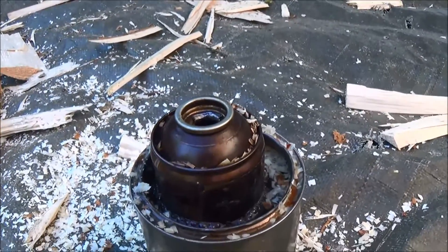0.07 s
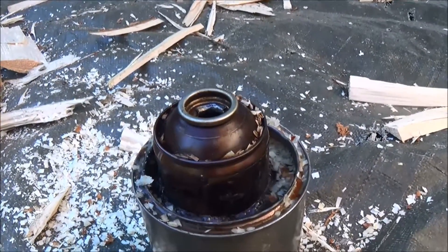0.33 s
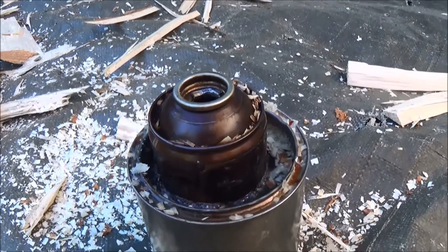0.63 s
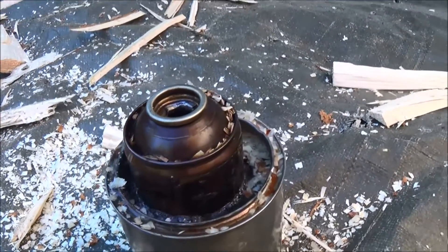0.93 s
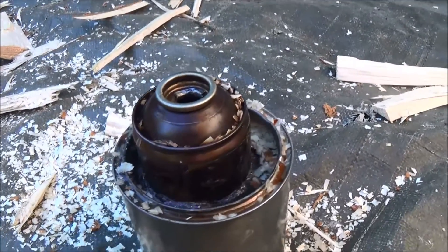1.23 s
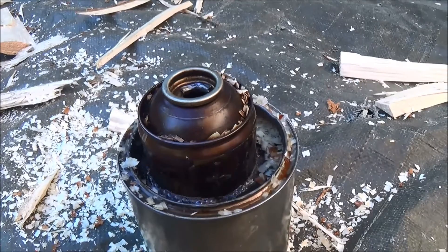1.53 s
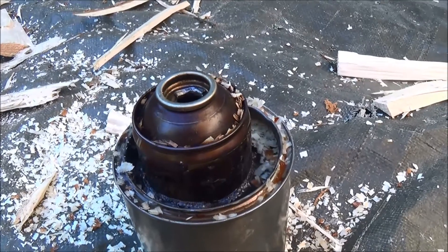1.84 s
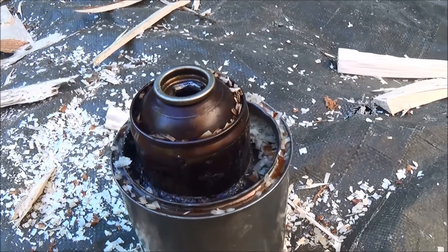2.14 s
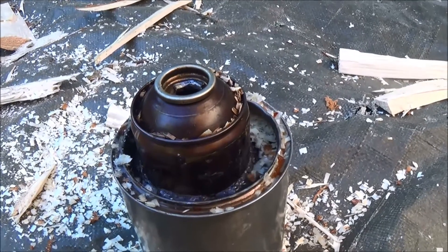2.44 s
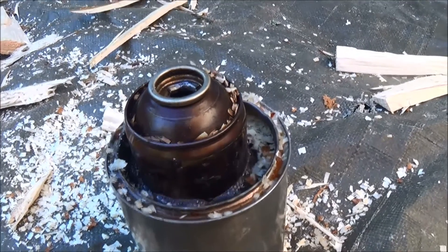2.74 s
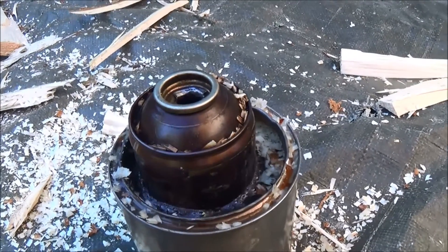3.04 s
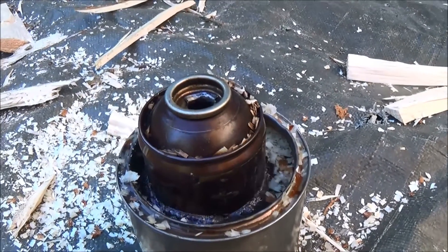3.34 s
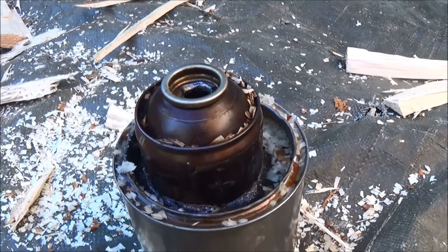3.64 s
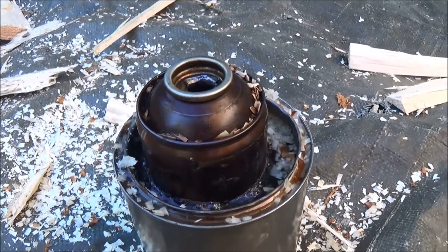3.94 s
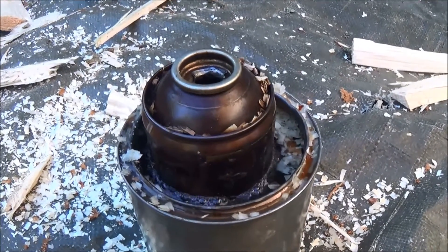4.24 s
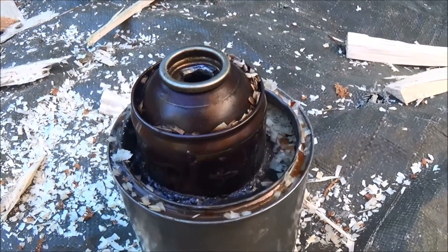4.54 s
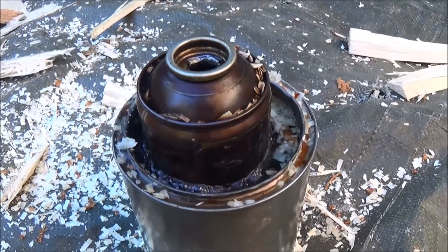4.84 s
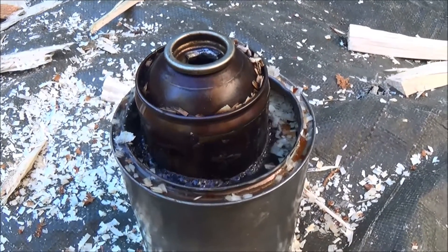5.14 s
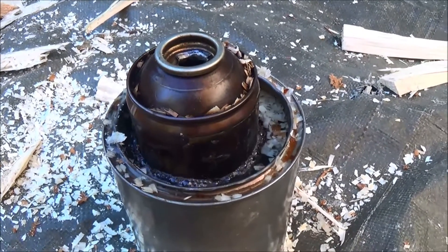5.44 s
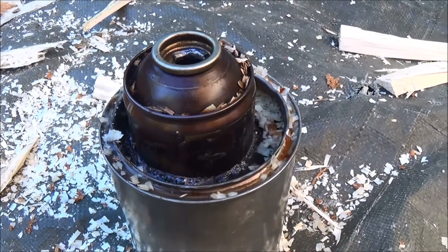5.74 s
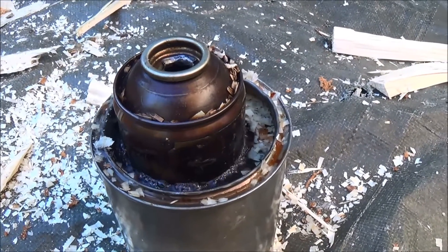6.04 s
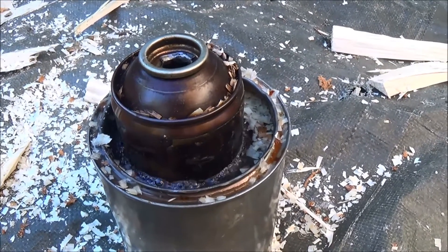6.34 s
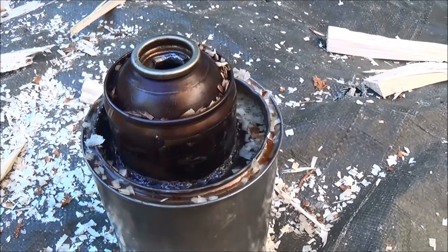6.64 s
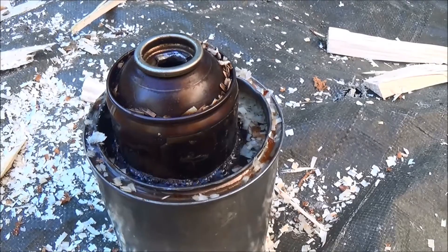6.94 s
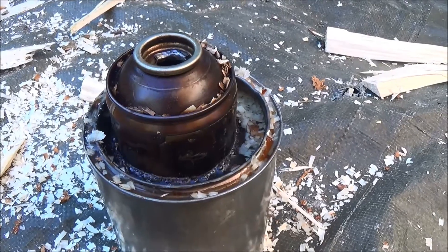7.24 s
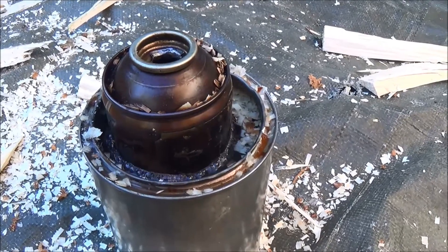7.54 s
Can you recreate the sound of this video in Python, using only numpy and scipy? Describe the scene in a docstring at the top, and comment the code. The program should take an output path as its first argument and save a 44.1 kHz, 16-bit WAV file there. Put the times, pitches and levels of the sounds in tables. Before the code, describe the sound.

A small pulse jet runs close by outdoors, a loud, rough buzzing roar of rapid hollow pops with hiss and rumble.

```python
"""A small pulse jet, a burner can with one round mouth and no valves, runs outdoors close to a phone.
About 52 times a second its fuel fires: a sharp pop, a swing of the gas in the can and a hissing jet.
The flow then turns round with a soft thud and fresh air whistles back in, while the flame rumbles below.
The pace keeps sagging and picking up, and one firing half fails."""
import sys
import numpy as np
from scipy import signal
from scipy.fft import rfft, irfft
from scipy.io import wavfile
from scipy.ndimage import map_coordinates

SR = 44100
rng = np.random.default_rng(int(sys.argv[2]) if len(sys.argv) > 2 else 0)


def unload_audio(sound):
    """Save the sound as a 16-bit wav file, at the path given as the first command line argument."""
    columns = np.transpose(np.atleast_2d(sound))
    # keep every value between -1 and 1, then stretch to whole-number steps
    steps = np.round(np.clip(columns, -1, 1) * 32767)
    wavfile.write(sys.argv[1], SR, steps.astype(np.int16))


N = 339570
HZ = np.fft.rfftfreq(N, 1 / SR)
AGE = np.arange(-300, 2600) / SR  # seconds since a firing, starting just before it

# the hollow voice that the can gives each pop: (frequency [Hz], boost [dB])
POP_VOICE = [(50, -6.5), (140, 6), (310, 0), (385, -4), (470, -1.5), (600, 0), (810, 0.5), (970, -5.5),
             (1150, -10), (1600, -6), (2400, -12.5)]

def pops(times, charge_db):
    """Each firing sends a short push of pressure through the can; a strong charge of fuel burns faster."""
    speed = undb(0.49 * charge_db + 3.2 * np.tanh(scatter(times)))
    burn_s = 0.00016 / speed
    front = lay(times, undb(-6.5 + charge_db) * speed * swell(0, burn_s, burn_s))
    # pockets of gas burn just behind the front, so no two pops sound alike
    pockets = lay(times, undb(-21 + .7 * charge_db) * swell(.0007, .0004, .0011))
    ragged = pockets * noise(1 / (1 + (HZ / 1400) ** 4), side_db=-10)
    return resonate(front + ragged, POP_VOICE)


# the burner's pace, sagging and picking up: (time [s], pace [firings per s])
PACE = [(0.0, 55.8), (0.19, 45.8), (0.41, 55.2), (0.93, 55.8), (1.26, 49.3), (1.36, 63.8), (1.46, 52.6),
        (2.46, 51.5), (2.56, 56.9), (2.88, 50.6), (3.29, 58.7), (3.47, 51.5), (3.63, 56.7), (3.94, 44.5),
        (4.07, 55.0), (4.41, 48.5), (4.51, 55.6), (5.22, 56.1), (5.74, 47.9), (6.05, 55.3), (6.17, 49.7),
        (6.33, 57.4), (6.75, 47.1), (7.19, 46.8), (7.5, 59.0), (7.7, 48.1)]
# the surges of the flame: (time [s], strength of the charge [dB])
SURGES = [(0, -1), (.6, -.2), (.84, 1.5), (1.2, -1.8), (1.46, 0.8), (1.8, -1.5), (2.95, -0.5), (3.17, 1),
          (3.47, -1.6), (3.75, -0.2), (4.75, 0.5), (4.93, 2), (5.2, -1.5), (5.48, 3), (5.62, -0.1),
          (6.3, -0.5), (6.5, 2), (6.68, 1), (7.7, -0.9)]

def firings():
    """The burner fires unevenly: gives each cycle's time, strength and length (about 1 is usual)."""
    t = np.arange(N) / SR
    pace_hz = np.interp(t, *np.transpose(PACE))
    count = np.cumsum(pace_hz) / SR
    times = np.interp(np.arange(.5, count[-1]), count, t)
    times = times + 0.001294 * wobble(times) + .00035 * scatter(times)[:, 0]
    surge_db = np.interp(times, *np.transpose(SURGES))[:, None]
    filling_db = 3 * np.tanh(scatter(times))  # the can never fills the same way twice
    charge_db = surge_db + filling_db - 4 * misfire(times)
    length = np.gradient(times)[:, None] * pace_hz.mean()
    return times, charge_db, length


def wobble(times, cycles_per_swing=8.81, carry_over=0.676):
    """A late firing delays the next ones, until the burner overshoots and swings back."""
    feedback = [1, -2 * carry_over * np.cos(2 * np.pi / cycles_per_swing), carry_over ** 2]
    swing = signal.lfilter([1], feedback, scatter(times)[:, 0])
    return swing / swing.std()


def misfire(times, at_s=6.568):
    """Marks the one firing that half fails with 1 and all others with 0."""
    gap_s = np.abs(times - at_s)
    return 1. * (gap_s == gap_s.min())[:, None]


# the can's low notes, first the gas swinging in the mouth: (pitch [Hz], time to fade 60 dB [s], level [dB])
CAN_NOTES = [(98, 0.05, -18), (137.7, 0.13, -33.5), (274, 0.079, -32.5)]

def can_ring(times, charge_db):
    """Escaping gas leaves suction behind and swings back; its heat shifts the pitch from cycle to cycle."""
    age, ring = np.maximum(AGE, 0), 0
    for hz, fade_s, db in CAN_NOTES:
        pitch_hz = hz * (1 + 0.069 * scatter(times))
        loudness = undb(db + 0.53 * charge_db - 60 * age / fade_s)
        ring = ring - loudness * np.sin(2 * np.pi * pitch_hz * age)  # minus: suction comes first
    return lay(times, ring)


def thuds(times, length):
    """Half a cycle on, the flow turns round in the mouth with a soft push and a slower, weaker pull."""
    turn_s = 0.00597 + 0.00369 * length + 0.00051 * scatter(times)
    width_s = 0.0007 * undb(2.26 * scatter(times))
    push = swell(turn_s, width_s, width_s)
    pull = .45 * swell(turn_s + 2 * width_s, width_s, 1.5 * width_s)
    return lay(times, undb(-17 + 2.6 * scatter(times)) * (push - pull))


# the hiss of gas going out: (frequency [Hz], relative level [dB])
JET_HISS = [(150, -8), (500, 4.5), (1100, -2), (1550, 3.5), (2300, 0), (3200, 4), (4500, 1), (6500, 3.5),
            (9000, 5), (10800, 7), (13300, 3), (15500, -7)]

def jet(times, charge_db, length, delay_s=.0034, rise_s=.00135, fall_s=.00165):
    """Hot gas spits out for a few milliseconds after each pop, later and longer in slow cycles."""
    late_s = AGE - delay_s * length - .00058 * scatter(times)
    flow = 1 / np.cosh(late_s / np.where(late_s < 0, rise_s, fall_s * length))
    spit_db = -16 + 0.11 * charge_db + 1.15 * scatter(times) - 20 * misfire(times)
    return lay(times, flow * undb(spit_db)) * noise(undb(across(JET_HISS)), side_db=-16)


# the hiss of air coming in: (frequency [Hz], relative level [dB])
AIR_HISS = [(300, 15.5), (1000, 17), (2200, 6), (3400, 12.5), (4500, 10.5), (7000, 9), (11000, 8.5),
            (13300, 4), (15500, -56)]
# the whistles of the hollow can: (pitch [Hz], width [Hz], relative level [dB])
AIR_WHISTLES = [(2790, 85, 14), (5290, 100, 4), (7860, 300, -32)]

def intake(times, length, steady_db=-56):
    """Fresh air hisses in, in big gulps and small ones, and blows the can like a whistle."""
    gulp_db = 10.5 * np.tanh(1.1 * scatter(times))
    gulp_shape = swell(.013 * length + .0015 * scatter(times), .0034, .003)
    gulps = lay(times, gulp_shape * undb(-39.5 + gulp_db))
    hiss = (undb(steady_db) + gulps) * noise(undb(across(AIR_HISS)), side_db=-6)
    peaks = sum(undb(db) / (1 + 2j * (HZ - hz) / width) ** 2 for hz, width, db in AIR_WHISTLES)
    blow = lay(times, swell(0.0049, 0.0037, 0.0056) * undb(-38 + 0.23 * gulp_db))
    return hiss + blow * heat_bend(noise(peaks, side_db=-33), times)


def heat_bend(whistles, times):
    """Hot gas lifts the whistles' pitch after each firing; cool air lets it sag again."""
    heat = lay(times, swell(0.004, 0.0022, 0.0067) * undb(1.43 * scatter(times)))
    position = np.cumsum(1 + .075 * (heat - heat.mean()))  # moving faster sounds higher
    return np.array([map_coordinates(ear, [position], order=3, mode="mirror") for ear in whistles])


# the rumble of the flame: (frequency [Hz], relative level [dB])
FLAME_RUMBLE = [(20, -7), (60, -6), (160, -0.5), (250, 2.5), (320, 5.5), (390, -7), (780, -13.5),
                (1100, -20), (2500, -18), (8000, -46)]

def flame(times, steady_db=-31.5, flare_db=-45):
    """The swirling flame rumbles all the time and flares after each firing."""
    flares = lay(times, swell(.003, 0.00071, 0.0032))
    return (undb(steady_db) + undb(flare_db) * flares) * noise(undb(across(FLAME_RUMBLE)), side_db=-12)


def undb(db):
    """Turns decibels into a number to multiply by."""
    return 10 ** (np.asarray(db) / 20)


def across(points, lowest_hz=16):
    """Joins the dots of a (frequency, value) table, giving every octave equal room."""
    hz, value = np.transpose(points)
    return np.interp(np.log(np.maximum(HZ, lowest_hz)), np.log(np.maximum(hz, lowest_hz)), value)


def noise(tone, side_db):
    """Stereo noise of strength about 1 with this tone; side_db sets how much the ears differ."""
    mid, side = irfft(rfft(rng.standard_normal((2, N))) * tone, N)
    return (mid + undb(side_db) * side * np.array([[1], [-1]])) / mid.std()


def scatter(times):
    """One random number around 0 for each cycle, as a column."""
    return rng.standard_normal(N // 100)[:len(times), None]


def lay(times, shapes):
    """Places one short shape at each firing time and adds them up."""
    at = np.round((times[:, None] + AGE) * SR).astype(int)
    inside = (at >= 0) & (at < N)
    return np.bincount(at[inside], np.broadcast_to(shapes, at.shape)[inside], N)


def swell(peak_s, rise_s, fall_s):
    """A smooth rise and fall around one moment of the cycle."""
    late_s = AGE - peak_s
    return np.exp(-.5 * (late_s / np.where(late_s < 0, rise_s, fall_s)) ** 2)


def resonate(sound, voice):
    """Passes a sound through a hollow body that boosts some frequencies and weakens others."""
    two_sided = irfft(np.log(undb(across(voice))), N)
    one_sided = two_sided * (1 + np.sign(np.fft.fftfreq(N)))  # ring after the blow, never before
    return irfft(rfft(sound) * np.exp(rfft(one_sided)), N)


# how much louder the left channel is than the right: (frequency [Hz], level gap [dB])
LEFT_LOUDER = [(60, -1.0), (110, 0.0), (200, 1.5), (380, 3.5), (700, 4.0), (1290, 2.0), (2380, 0.0),
               (4400, 0.0), (8120, 0.5), (15000, 0.0)]
# how far the left channel runs ahead: (frequency [Hz], lead [radians])
LEFT_AHEAD = [(0, 0), (260, 1.3), (860, 0.4), (1720, 0.0), (16100, -0.0)]

def scene():
    """Everything comes from the one mouth; the phone widens the one sound into stereo."""
    times, charge_db, length = firings()
    beats = pops(times, charge_db) + can_ring(times, charge_db) + thuds(times, length)
    engine = beats + jet(times, charge_db, length) + intake(times, length) + flame(times)
    left = undb(across(LEFT_LOUDER) / 2) * np.exp(.5j * across(LEFT_AHEAD))
    return irfft(rfft(engine) * np.array([left, 1 / left]), N)


def record(dry, bass_hz=25, ceiling=.78, top_hz=15900):
    """The phone thins the deep bass, rounds the tallest peaks and cuts the highest treble."""
    thin = signal.sosfilt(signal.butter(1, bass_hz, "high", fs=SR, output="sos"), dry)
    rounded = thin / (1 + (thin / ceiling) ** 4) ** .25
    return signal.sosfilt(signal.ellip(10, .2, 80, top_hz, fs=SR, output="sos"), rounded)


dry = scene()
out = record(dry)
unload_audio(out)
```